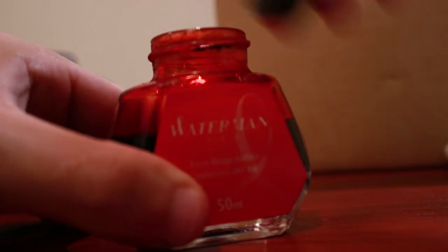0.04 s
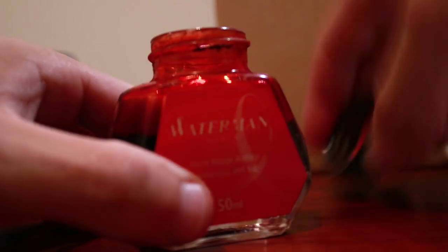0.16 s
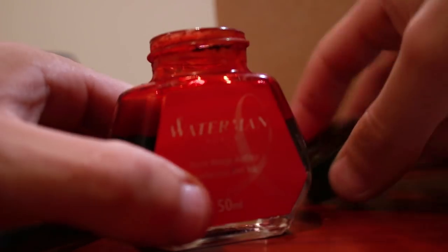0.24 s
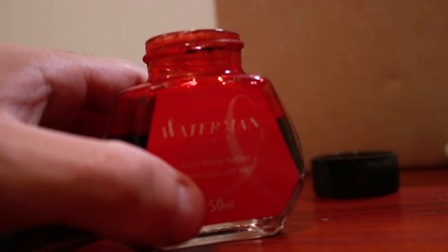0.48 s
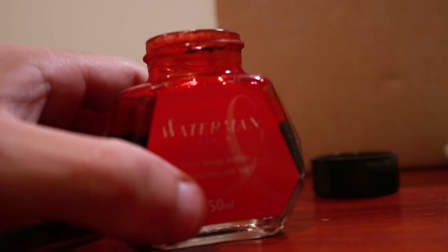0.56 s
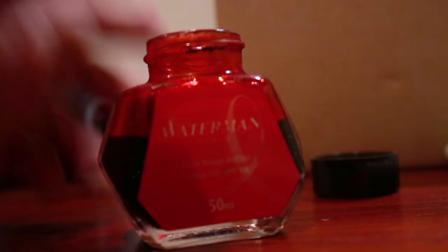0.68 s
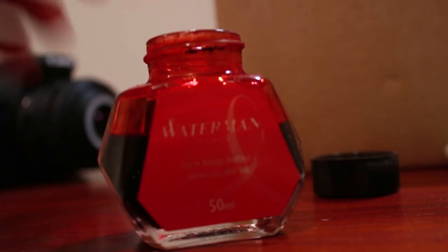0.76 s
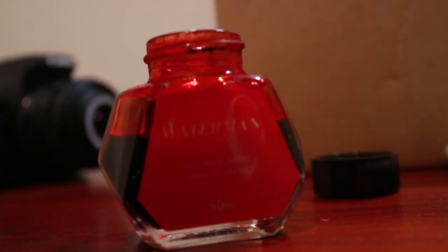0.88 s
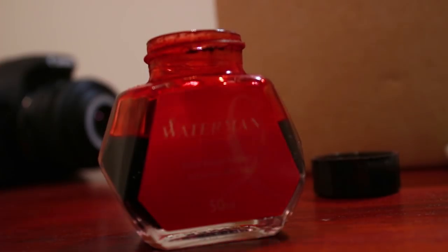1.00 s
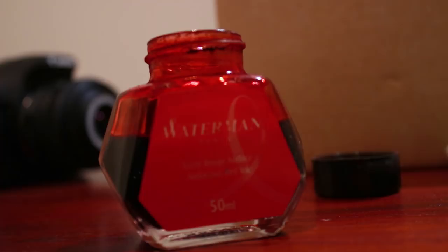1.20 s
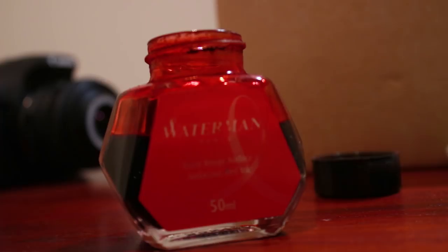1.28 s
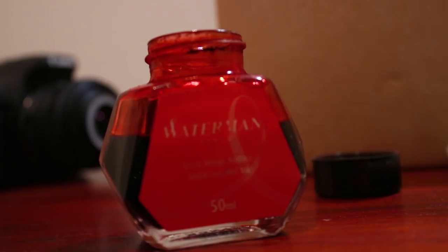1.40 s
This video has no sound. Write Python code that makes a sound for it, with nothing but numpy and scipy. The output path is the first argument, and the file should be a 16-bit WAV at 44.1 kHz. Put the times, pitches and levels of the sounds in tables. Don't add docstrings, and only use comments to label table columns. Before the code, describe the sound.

A hard plastic cap rubs off a glass bottle's thread, knocks on a wooden table, scrapes, clacks flat and rattles still; then a hand thuds and a nail ticks, close microphone in a small quiet room.

```python
import sys
import numpy as np
from scipy import signal
from scipy.fft import rfft, irfft
from scipy.io import wavfile
from scipy.ndimage import uniform_filter1d

SR = 44100
rng = np.random.default_rng(int(sys.argv[2]) if len(sys.argv) > 2 else 0)


def wav_record(signal):
    frames = np.transpose(np.atleast_2d(signal))
    bounded = np.clip(frames, -1, 1)
    quanta = np.round(bounded * 32767).astype(np.int16)
    wavfile.write(sys.argv[1], SR, quanta)


def elevation(decibels):
    levels = np.asarray(decibels, float)
    return 10 ** (levels / 20)


N = 63945
TOP_HZ = 15550


def level(x, db):
    return x * elevation(db) / np.sqrt(np.mean(x ** 2))


def coloured(points):
    hz, db = np.array(points).T
    f = np.maximum(np.fft.rfftfreq(N, 1 / SR), 1)
    colour = elevation(np.interp(np.log(f), np.log(hz), db))
    return level(irfft(rfft(rng.standard_normal(N)) * colour, N), 0)


def resonate(x, hz, width_hz):
    b, a = signal.iirpeak(hz, hz / width_hz, fs=SR)
    return signal.lfilter(b, a, signal.lfilter(b, a, x))


def hits(table, modes, crack_db, spread, soft_hz):
    scatter_db, longest_ring_s, first_blow = 1.5, 0.06, 6
    out = np.zeros(N + 16384)
    t = np.arange(6000) / SR
    push_ms = t[:2048] * 1000
    mode_hz, mode_db, mode_t60 = np.repeat(np.array(modes), 3, axis=0).T
    sign = (-1) ** (np.arange(len(mode_hz)) // 3)
    for s, db, tilt_db, ms in table:
        push = rng.standard_normal(2048) * np.exp(-push_ms / ms)
        push[0] = first_blow
        push = irfft(np.exp(1j * np.angle(rfft(push)))) * np.exp(-push_ms / 2 / ms)
        push_top_hz = min(soft_hz * 2 ** (tilt_db / 4), TOP_HZ)
        push = signal.lfilter(*signal.butter(2, push_top_hz, fs=SR), push)

        level_chance, pitch_chance = rng.standard_normal((2, len(mode_hz)))
        pitch_chance[::3] = 0
        tilt = tilt_db * np.log2(mode_hz / 2000)
        gains = sign * elevation(mode_db + tilt + scatter_db * level_chance)
        hz = np.minimum(mode_hz * (1 + spread * pitch_chance), TOP_HZ)[:, None]
        t60 = np.minimum(mode_t60, longest_ring_s)[:, None]
        ring = gains @ (np.sin(2 * np.pi * hz * t) * elevation(-60 * t / t60))
        ring[0] += elevation(crack_db)

        y = signal.fftconvolve(push, ring)
        start = int(s * SR)
        out[start:start + len(y)] += y * elevation(db) / np.sqrt(np.mean(y[:256] ** 2))
    return out[:N]


def rub(pressure, resonances):
    grit_db = 1.6
    clicks = rng.standard_normal(N) * elevation(grit_db * rng.exponential(size=N))
    body = sum(elevation(db) * level(resonate(clicks, hz, w), 0) for hz, w, db in resonances)
    s, db = np.array(pressure).T
    return level(body, 0) * elevation(np.interp(np.arange(N) / SR, s, db, left=-120, right=-120))


def fading_tones(table, rise_s):
    out, t = np.zeros(N), np.arange(N) / SR
    for s, hz, t60, db in table:
        u = np.maximum(t - s, 0)
        fade = np.exp(-np.log(1000) * u / t60) * (1 - np.exp(-u / rise_s))
        out += elevation(db) * np.sin(2 * np.pi * hz * u) * fade
    return out


# f/Hz, level/dB [per Hz]
HISS_COLOUR = [(240, -12.5), (400, -6.5), (496, -6), (2710, -12), (2970, -10.5), (3860, -11.5),
               (15500, -7.5)]


def hiss():
    return coloured(HISS_COLOUR) * elevation(-61.5)


# f/Hz, level/dB [per Hz]
MURMUR = [(18, -21), (45, -5.5), (140, -3.5), (330, -5.5), (600, -11.5), (2250, -15.5), (2600, -32),
          (3400, -24)]
# f/Hz, width/Hz, level/dB
HUMS = [(207, 22, -10.5), (464, 26, -14), (3100, 480, -21)]
# t/s, open up to f/Hz, level/dB
GATE = [(0, 3210, -45), (.2, 3270, -46.5), (.55, 3580, -50.5), (.72, 3400, -48.5), (.92, 3300, -49.5),
        (0.948, 2350, -48.5), (1.09, 2406, -52), (1.137, 1100, -47), (1.187, 453, -49), (1.27, 400, -52),
        (1.31, 240, -59), (1.45, 180, -55)]


def room_tone():
    steepness = 50
    murmur = coloured(MURMUR)
    for hz, width_hz, db in HUMS:
        murmur = murmur + level(resonate(rng.standard_normal(N), hz, width_hz), db)
    f, t, z = signal.stft(murmur, SR, nperseg=1024)
    gate_s, gate_hz, gate_db = np.array(GATE).T
    top = np.exp(np.interp(t, gate_s, np.log(gate_hz)))
    z = z * elevation(np.interp(t, gate_s, gate_db)) / (1 + (f[:, None] / top) ** steepness)
    return signal.istft(z, SR, nperseg=1024)[1][:N]


def room(x):
    room_db, t60_1khz_s, treble_loss, rise_s = -10.5, 0.21, 0.45, 0.0035
    f, t, z = signal.stft(rng.standard_normal(SR // 2), SR, nperseg=256)
    t60 = t60_1khz_s * (np.maximum(f, 500) / 1000) ** -treble_loss
    tail = signal.istft(z * elevation(-60 * t / t60[:, None]), SR, nperseg=256)[1]
    tail = tail * np.minimum(np.arange(len(tail)) / SR / rise_s, 1)
    return signal.fftconvolve(x, tail / np.sqrt(np.sum(tail ** 2)))[:N] * elevation(room_db)


# from t/s, to t/s, share removed [0-1]
DEAF_TIMES = [
    (.292, .336, 1),
    (.5, .632, .55),
]


def deaf(x):
    centre_hz, width_hz = 4300, 900
    t = np.arange(N) / SR
    shut = sum(share * ((t > a) & (t < b)) for a, b, share in DEAF_TIMES)
    shut = uniform_filter1d(shut, size=600)
    edges_hz = [centre_hz - width_hz / 2, centre_hz + width_hz / 2]
    return x - shut * signal.filtfilt(*signal.butter(2, edges_hz, "band", fs=SR), x)


# t/s, f/Hz, t60/s, level/dB
SWAYS = [
    (.222, 58, 0.11, -26.5),
    (.29, 45, .2, -40),
    (.565, 95, 0.25, -45.5),
    (.652, 81.46, 0.14, -28),
    (.66, 47.4, .4, -28),
    (1.041, 111, 0.058, -35),
    (1.165, 222.8, .25, -45),
    (1.214, 85, 0.075, -35),
    (1.39, 40.05, 0.26, -54),
]


def table_sways():
    return fading_tones(SWAYS, rise_s=0.0048)


# t/s, f/Hz, length/ms, level/dB
SQUEAKS = [(0.013, 4563, 7.7, -44.5), (0.119, 14000, 19, -53.5), (0.184, 11420, 44, -58.5),
           (.182, 13600, 21, -58), (1.0, 10130, 15, -60), (1.231, 3595, 25, -53), (1.235, 6405, 34, -62.5),
           (1.295, 3662, 18, -53.5), (1.297, 3100, 15, -62), (1.297, 9000, 20, -60), (1.416, 9430, 16, -63),
           (1.427, 12640, 21, -63.5), (1.438, 4900, 19, -63.5)]


def squeaks():
    out, t = np.zeros(N), np.arange(N) / SR
    for s, hz, ms, db in SQUEAKS:
        u = np.clip((t - s) * 1000 / ms, 0, 9)
        puff = 3 * u * np.exp(1 - 3 * u)
        out += level(resonate(rng.standard_normal(N), hz, width_hz=300), db) * puff
    return out


# t/s, level/dB
SLIDE = [
    (.17, -69.5),
    (.19, -58.5),
    (.22, -67.5),
    (.46, -62),
    (.56, -58.5),
    (.58, -53.5),
    (.64, -59.5),
    (.68, -46.5),
    (.72, -64.5),
]
# f/Hz, width/Hz, level/dB
GLASS = [(3100, 200, 0), (5050, 1300, -1.5), (6500, 500, -1.5), (8500, 1700, 3.5), (11400, 670, 0.5),
         (10900, 360, -4.5), (12600, 300, -2.5), (13600, 330, 3), (14700, 700, -1)]


def finger_slide():
    return rub(SLIDE, GLASS)


# t/s, level/dB, tilt/dB per octave, contact/ms
TAPS = [
    (1.2152, -39.5, 1, 7.4),
]
# f/Hz, level/dB, t60/s
TIP = [(1240, -14, .02), (2494, -10, .02), (3570, -1.5, 0.021), (4110, -2, 0.011), (5030, -5.5, .015),
       (5714, -3.5, .02), (6300, 1, 0.038), (8070, -6, 0.0085), (10250, -9.5, .015), (12600, -2, .015),
       (13260, -10.5, .015)]


def finger_taps():
    return hits(TAPS, TIP, crack_db=-5.5, spread=.012, soft_hz=13900)


# t/s, level/dB, tilt/dB per octave, contact/ms
TICKS = [
    (1.1086, -28.5, 6, 0.52),
    (1.1125, -39.5, 3.5, 14),
]
# f/Hz, level/dB, t60/s
NAIL = [(1540, -11, 0.045), (2360, -3.5, 0.011), (2770, -12, 0.066), (3450, 3, 0.0053), (5100, -4, 0.013),
        (6700, -0.5, 0.011), (7800, 7.5, 0.0032), (11600, 12, 0.0023), (13260, -3, 0.016),
        (14600, -15, 0.0083)]


def nail_ticks():
    return hits(TICKS, NAIL, crack_db=-13.0, spread=0.015, soft_hz=14650)


# t/s, level/dB, tilt/dB per octave, contact/ms
PATS = [
    (.5375, -44, 4, .6),
    (.5665, -41.5, 2, 9.9),
    (.587, -43.5, -3.5, 2.5),
    (.622, -41.5, -10.5, 1.2),
]
# f/Hz, level/dB, t60/s
SOFT = [(589, 6, 0.027), (735, 7.5, .02), (2000, 4.5, 0.006)]


def finger_pats():
    return hits(PATS, SOFT, crack_db=-33.5, spread=0.075, soft_hz=2500)


# t/s, level/dB, tilt/dB per octave, contact/ms
THUDS = [
    (.0095, -30, -9.5, 0.73),
    (.0235, -51, -6, 3.9),
    (.6322, -15.5, 2.5, .4),
    (.6398, -24, 0.5, .5),
    (.6432, -23.5, 0.5, .4),
    (.652, -37.5, 2.5, 2),
    (.6665, -38, -8, 1.5),
    (.688, -37.5, -6.5, 4),
]
# f/Hz, level/dB, t60/s
TABLE = [(232, -15, 0.12), (317, -4, 0.065), (479, 7, 0.022), (615, -5, 0.049), (649.5, -2, 0.038),
         (807, -6, 0.022), (925, -3.5, 0.025), (1057, -2, 0.03), (1460, -21.5, 0.09), (2010, -12.5, 0.01),
         (2604, -31, 0.032), (2995, -28.5, 0.0089)]


def table_thuds():
    return hits(THUDS, TABLE, crack_db=-48, spread=0.015, soft_hz=1500)


# t/s, f/Hz, t60/s, level/dB
BOTTLE = [
    (.369, 6498, 0.23, -26.5),
    (.369, 6346, 0.21, -34.5),
]


def bottle_ring():
    return fading_tones(BOTTLE, rise_s=.002)


# t/s, level/dB
LIFT = [
    (0, -33.5),
    (.02, -34),
    (.07, -46),
    (.14, -50),
    (.17, -65),
]
# f/Hz, width/Hz, level/dB
THREAD = [(569, 500, -4), (1710, 460, -11), (2500, 370, -18), (3050, 490, -13.5)]


def cap_leaving_thread():
    muffle = signal.butter(10, 3358, fs=SR, output="sos")
    return signal.sosfilt(muffle, rub(LIFT, THREAD))


# f/Hz, width/Hz, level/dB
RASP = [(770, 240, -6), (1470, 990, 10), (2420, 510, 0.5), (3132, 260, 1), (5280, 290, -12.5),
        (6800, 450, -10.5), (8900, 580, -12.5), (8800, 350, -8.5), (11700, 580, -2), (13650, 900, -0.5),
        (14900, 480, -11)]
# t/s, level/dB
SCUFF = [
    (.262, -45),
    (.285, -36.5),
    (.305, -28.5),
    (.32, -34.5),
    (.33, -31),
    (.34, -26.5),
    (.35, -36.5),
    (.365, -47.5),
]


def rim_scuff():
    return rub(SCUFF, RASP[:4])


# t/s, level/dB
SCRAPE = [
    (.27, -81.5),
    (.287, -46.5),
    (.302, -30),
    (.318, -28),
    (.329, -38.5),
    (.338, -56),
    (.352, -64),
]


def rim_scrape():
    return rub(SCRAPE, RASP[4:])


# t/s, level/dB, tilt/dB per octave, contact/ms
KNOCKS = [
    (.2213, -7.5, 2.5, 3.2),
    (.2285, -26.5, -3.5, 2.9),
    (.3032, -29.5, 2, 0.42),
    (.3345, -31.5, -5, 0.86),
    (.3395, -30, 5, 0.66),
    (.3425, -23, -2, 2),
]
# f/Hz, level/dB, t60/s
RIM = [(349, -4.5, 0.021), (713, -4, 0.046), (880, -5, 0.025), (1008, -2, 0.013), (1430, -2, 0.053),
       (1565, -1, 0.013), (2133, 7.5, 0.018), (2616, -4, 0.022), (3400, -5.5, 0.036), (4920, -11.5, 0.012),
       (7300, -12, 0.004), (10400, -23.5, .008), (14100, -18.5, .012)]
# t/s, level/dB, tilt/dB per octave, contact/ms
REKNOCKS = [
    (.2478, -21, -2.5, 1.3),
    (.2512, -14, 1.5, 2.1),
    (.2545, -15, -1, 1.2),
]
# f/Hz, level/dB, t60/s
FAR_RIM = [(713.5, 0, .035), (1020, -1.5, 0.051), (1592, 0.5, 0.11), (2050, -3.5, 0.044), (2654, -7, 0.017),
           (3400, -11.5, 0.023), (4960, -9.5, 0.0066), (7300, -16.5, 0.0097)]


def cap_knocks():
    near = hits(KNOCKS, RIM, crack_db=-5, spread=0.013, soft_hz=15000)
    far = hits(REKNOCKS, FAR_RIM, crack_db=-9.5, spread=0.03, soft_hz=6500)
    return near + far


# t/s, level/dB, tilt/dB per octave, contact/ms
CLACKS = [
    (.3678, -6, 2.5, 1.6),
    (.3700, -18, 1, 2),
    (.3765, -25, -3, 4),
]
# f/Hz, level/dB, t60/s
FLAT = [(200, -15, 0.069), (1117, -5.5, 0.063), (1483, -8.5, 0.02), (2120, -1, 0.0081), (2457, -7.5, 0.033),
        (3016, -0.5, 0.0092), (4480, -9, 0.01), (5340, -2.5, 0.011), (6070, -1.5, 0.0082),
        (6498, -2, 0.034), (7800, 4, 0.002), (8650, -1.5, 0.0065), (11530, -9, 0.0042),
        (13100, -14.5, 0.007)]


def cap_clack():
    return hits(CLACKS, FLAT, crack_db=9.5, spread=0.025, soft_hz=12500)


# t/s, level/dB, tilt/dB per octave, contact/ms
BOUNCES = [
    (.385, -20.5, -4.5, 1.3),
    (.3923, -11.5, 2, 2.4),
    (.3995, -21, 5, 2.7),
    (.4058, -20.5, 4.5, 2.7),
    (.4095, -27, -1.5, 2),
    (.414, -29.5, 4.5, 14),
    (.428, -29.5, -0.5, 30),
]
# f/Hz, level/dB, t60/s
EDGE = [(201, -17.5, 0.052), (748, -8.5, 0.013), (1060, -6, 0.015), (1620, -5.5, .025), (1830, -6, .02),
        (2500, 3, .008), (2930, -0.5, 0.0093), (3510, 1.5, 0.0071), (4600, -3, 0.0088), (5560, -2.5, .01),
        (6498, -8.5, .04), (7600, -1, .006), (9840, -13, 0.015), (13500, -6, .006)]


def cap_bounces():
    return hits(BOUNCES, EDGE, crack_db=-2, spread=0.04, soft_hz=12600)


def microphone(x):
    low_cut = signal.butter(4, 175., "high", fs=SR, output="sos")
    high_cut = signal.butter(8, 15100, fs=SR, output="sos")
    return signal.sosfilt(np.vstack([low_cut, high_cut]), x)


def scene():
    dull = microphone(cap_knocks() + table_thuds() + finger_pats() + rim_scuff())
    bright = microphone(cap_clack() + cap_bounces() + bottle_ring())
    thread = cap_leaving_thread()
    small = nail_ticks() + finger_taps() + squeaks() + finger_slide() + rim_scrape() + thread
    echo = room(bright + elevation(-2.5) * dull)
    background = table_sways() + room_tone() + hiss()
    mid = deaf(dull + bright + echo + small + background)
    return np.array([mid, mid])


def band_limit(x):
    return signal.sosfilt(signal.butter(12, 15680, fs=SR, output="sos"), x)


def record(dry):
    ceiling = 1.15
    x = ceiling * np.tanh(dry / ceiling)
    scrambled = x[0] * rng.choice([-1, 1], N)
    side = elevation(-31.5) * signal.lfilter(*signal.butter(1, 1520, "high", fs=SR), scrambled)
    side = side + elevation(-44) * np.roll(x[0], 441)
    top_cut = signal.ellip(8, .2, 70, TOP_HZ, fs=SR, output="sos")
    x = signal.sosfilt(top_cut, x + np.array([side, -side]))
    return band_limit(x)


dry = scene()
out = record(dry)
wav_record(out)
```